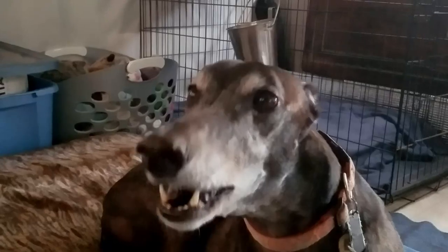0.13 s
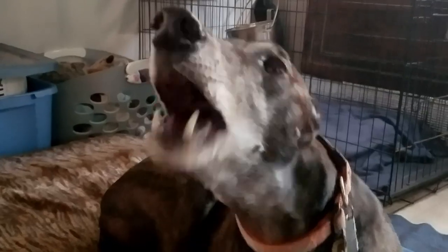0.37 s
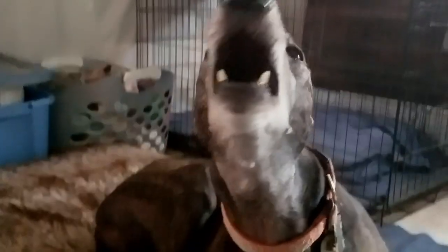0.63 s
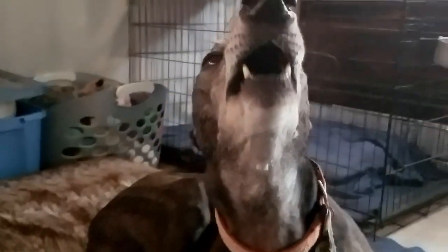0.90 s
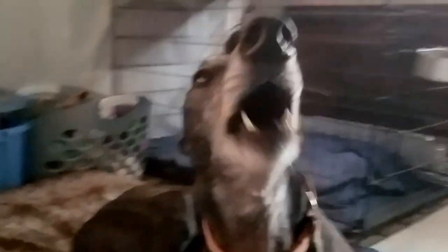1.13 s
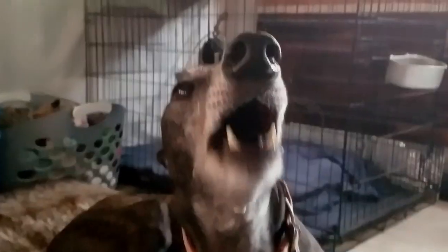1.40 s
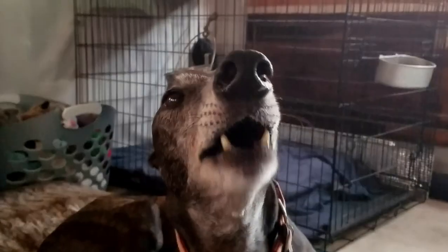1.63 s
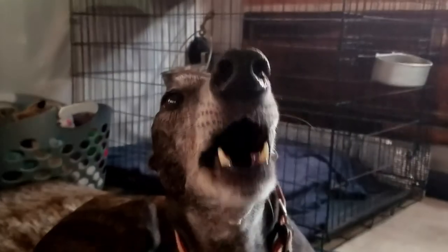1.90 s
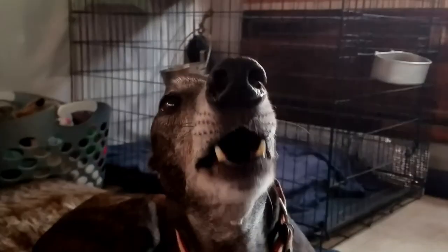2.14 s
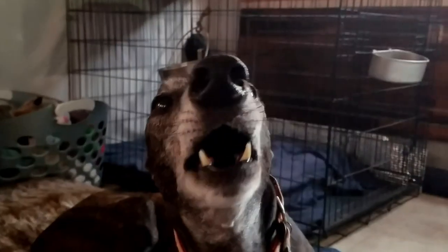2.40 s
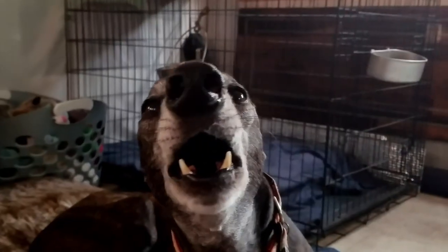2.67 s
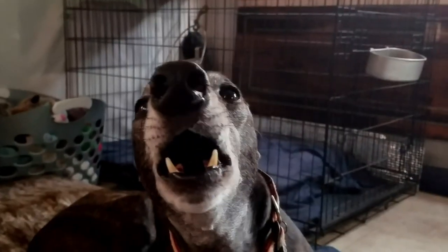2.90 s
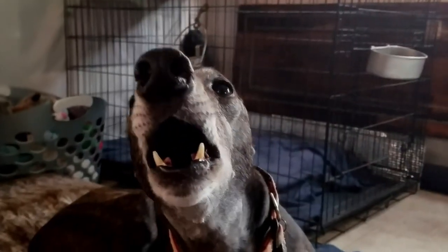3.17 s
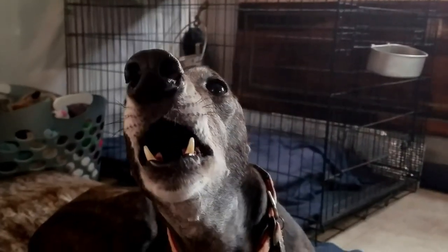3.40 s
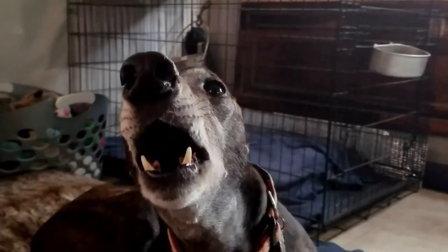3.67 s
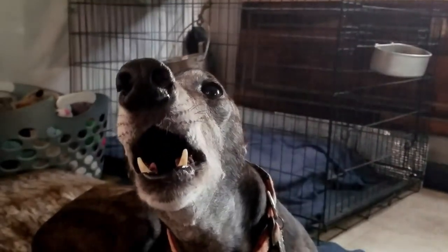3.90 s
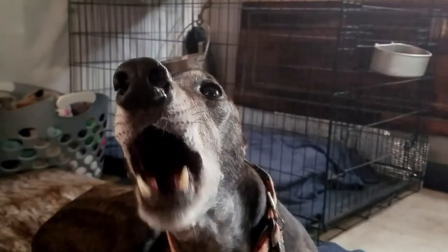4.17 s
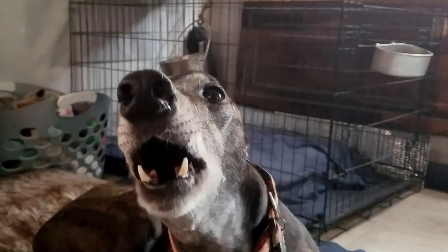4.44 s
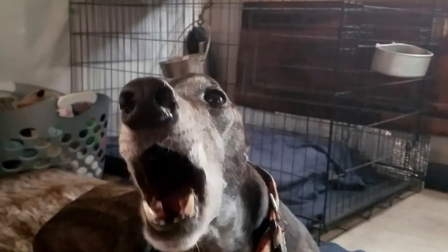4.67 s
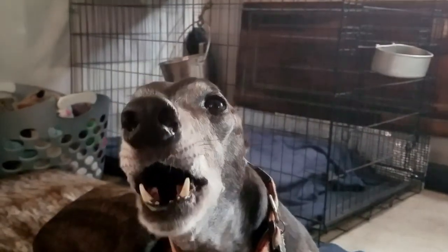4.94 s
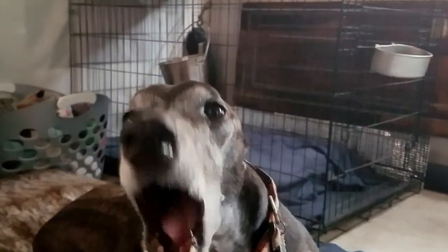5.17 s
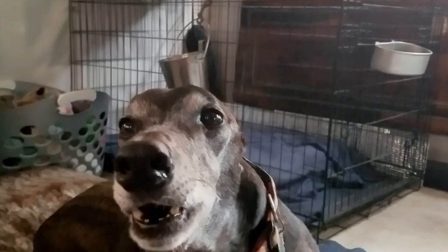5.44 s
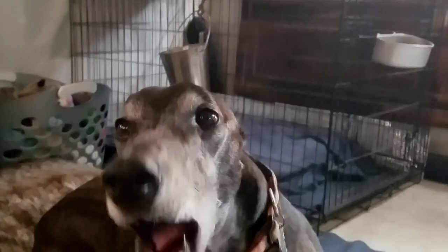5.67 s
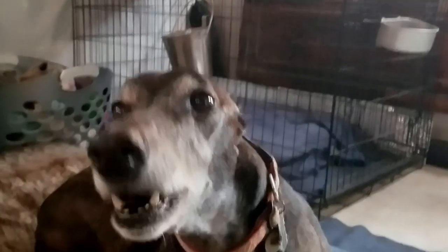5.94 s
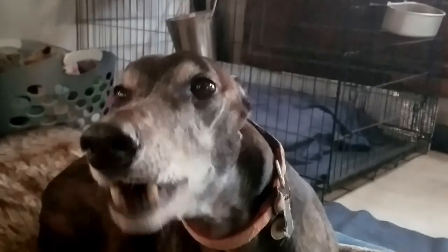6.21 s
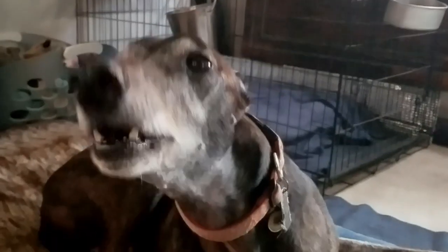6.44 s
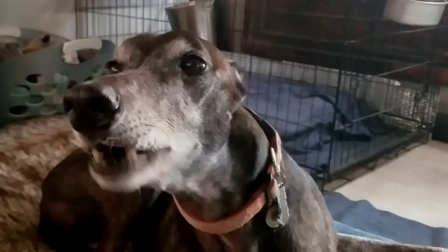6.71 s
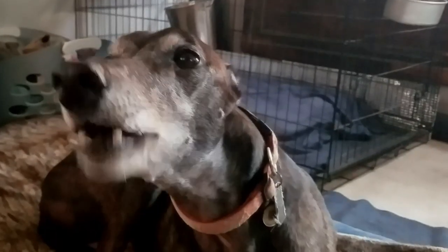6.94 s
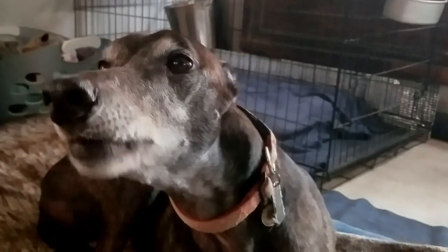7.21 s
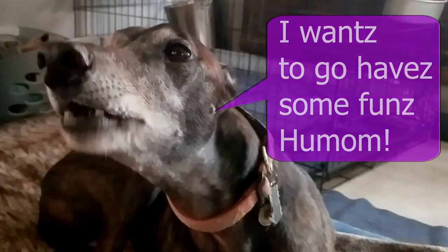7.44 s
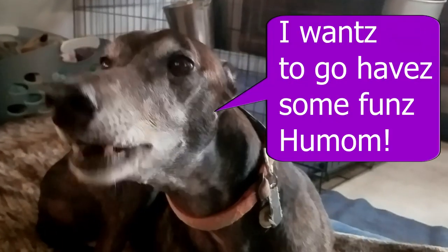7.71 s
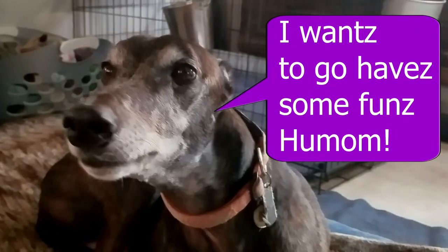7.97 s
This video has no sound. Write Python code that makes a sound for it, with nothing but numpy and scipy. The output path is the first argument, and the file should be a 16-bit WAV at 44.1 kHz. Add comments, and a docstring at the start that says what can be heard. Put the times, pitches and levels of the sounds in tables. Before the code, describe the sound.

A single dog howls right in front of the microphones, dry with only a short room echo. Raspy yelps come first, then wobbling oo-to-ow swells and a long, nearly steady howl. Near the end the voice flips between registers in shorter, rougher cries that fall away. Small piercing nose whistles peep through, then soft taps in the faint room air. The voice sits slightly to the right.

```python
"""Dog howling in a small room

A dog howls close to a two-microphone camera in a small furnished room: a creaky start, two yelps, one long
wavering note, then register jumps and short notes. The voice is a stack of partials shaped by moving
resonances; irregular flaps make the rasp. A thin nasal whistle, a sine with overtones and hiss, joins
the end, then faint knocks. Decaying noise gives the echo; faint shaped noise gives the room's rumble and hiss."""
import sys
import numpy as np
from scipy import signal
from scipy.fft import rfft, irfft, next_fast_len
from scipy.io import wavfile
from scipy.ndimage import uniform_filter1d, map_coordinates

SR = 44100
rng = np.random.default_rng(int(sys.argv[2]) if len(sys.argv) > 2 else 0)


def gain_from_db(level_db):
    """Convert decibel levels to linear amplitude factors (20 dB per decade)."""
    decades = np.asarray(level_db, float) / 20
    return 10 ** decades


def wav_record(signal):
    """Record a signal, one row per channel, as 16-bit PCM in the file named by sys.argv[1]."""
    frames = np.transpose(np.atleast_2d(signal))
    bounded = np.clip(frames, -1, 1)
    # unit amplitude maps onto the largest positive 16-bit level
    quanta = np.round(bounded * 32767).astype(np.int16)
    wavfile.write(sys.argv[1], SR, quanta)


N = 356592
TIME = np.arange(N) / SR


def unit(x):
    """Scaled to rms 1."""
    return x / np.sqrt(np.mean(x ** 2) + 1e-20)


def along(points, hz):
    """Interpolates (Hz, value) points on a log frequency axis."""
    f, v = np.transpose(points)
    return np.interp(np.log(hz + 1), np.log(f + 1), v)


def curves(rows, t=TIME):
    """One value per instant for each column after the time."""
    s, *cols = np.transpose(rows)
    return [np.interp(t, s, c) for c in cols]


def wobble(rate):
    """A smooth random curve, rate knots a second."""
    return map_coordinates(rng.standard_normal(int(N * rate / SR) + 4), [TIME * rate])


def filtered(x, response):
    """Passes x through a complex response of frequency."""
    m = next_fast_len(N + 8192)
    return irfft(rfft(x, m) * response(np.fft.rfftfreq(m, 1 / SR)), m)[..., :N]


def notes(tables, edge):
    """For each table: its stretch of samples, its columns and a fade at both ends."""
    for rows in tables:
        part = slice(round((rows[0][0] - edge) * SR), round((rows[-1][0] + edge) * SR))
        t = TIME[part]
        yield part, curves(rows, t), np.clip(np.minimum(t - t[0], t[-1] - t) / (2 * edge), 0, 1)


# Resonances that move as the mouth opens. Each row: centre in Hz shut, centre in Hz open, width in Hz,
# level in dB shut, level in dB open.
TRACT = [(639, 1251, 139, -2, 4.5), (1001.3, 1897.4, 167.3, -11, -5), (2224, 2323, 96, -50, -7.5),
         (2700, 2760, 132, -45.5, -23.5)]
# A side cavity cancels a narrow band. One row: centre in Hz shut, centre in Hz open, width in Hz, depth in dB.
NOTCH = (653, 1194, 65, -25.5)


def tract(f, opening, shift_hz, gain_db):
    """Gain in dB of the mouth and throat, a set of resonances that slide with the mouth opening."""
    roll_off_hz = 3000 + shift_hz  # the moving resonances pass little above this

    def mix(shut, wide):
        return shut + (wide - shut) * opening

    power = 0
    for i, (hz_shut, hz_open, width, db_shut, db_open) in enumerate(TRACT):
        top = i == len(TRACT) - 1  # only the last resonance takes the shift and gain
        away = f - mix(hz_shut, hz_open) - top * shift_hz
        power = power + gain_from_db(mix(db_shut, db_open) + top * gain_db) ** 2 / (1 + (2 * away / width) ** 2) ** 2
    power = power / (1 + (f / roll_off_hz) ** 10)
    shut, wide, width, depth_db = NOTCH
    return 10 * np.log10(power) + depth_db * np.exp(-((f - mix(shut, wide)) / width) ** 2)


# A slower second vibration beats against the voice. Each row: start in seconds, end in seconds, beat in Hz,
# sideband level in dB, lower over upper sideband of the overtones in dB, fading in dB per second.
BEATS = [(0.346, 0.389, 150, -9, 0, 16.5), (0.442, 0.517, 111.6, -9, -1, 56),
         (0.595, 0.619, 110, -9.5, -10.5, -11), (0.672, 0.833, 111.8, -16.5, 21.5, 70),
         (1.07, 1.137, 111.4, -6.5, -2, 2), (4.85, 4.993, 97.25, -10, -3.5, 111),
         (5.735, 5.906, 90.8, -10.5, 3.5, 79.5)]
# The fundamental's sidebands against the row's level. One row: lower in dB, upper in dB.
BEAT_FUNDAMENTAL_DB = (-9.5, -2)


def sidebands():
    """The second vibration as complex factors that split the fundamental (row 0) and the overtones (row 1)."""
    split = np.ones((2, N), complex)
    waver = np.cumsum(1 + .025 * wobble(50)) / SR
    for start, end, hz, db, skew_db, fading_db in BEATS:
        gate = np.clip(np.minimum((TIME - start) / 0.009, (end - TIME) / 0.026), 0, 1)
        gate = gate * gain_from_db(1.5 * wobble(40)) * gain_from_db(-fading_db * abs(TIME - start))
        spin = np.exp(2j * np.pi * hz * waver)
        low = gain_from_db(db + np.array([[BEAT_FUNDAMENTAL_DB[0]], [skew_db / 2]]))
        high = gain_from_db(db + np.array([[BEAT_FUNDAMENTAL_DB[1]], [-skew_db / 2]]))
        below = 1 / spin + .25 / spin ** 2
        above = spin + .6 * spin ** 2 + .3 * spin ** 3
        split += gate * (low * below + high * above)
    return split


# The voice, one table per register. Each row: time in seconds, pitch in Hz before smoothing,
# fundamental in dB, mouth opening from 0 to 1, overtone drive in dB.
HOWL = [
    [(0.045, 278.3, -50.5, 0.0, 10), (0.095, 299, -49.5, 0.1, -12), (0.105, 289, -59, 0.19, 17.5)],
    [(0.2, 771, -21.5, 0.6, 6.5), (0.25, 814.5, -9.5, 0.49, 9), (0.275, 787.4, -10.5, 0.44, 14),
     (0.3, 729, -15.5, 0.34, 13.5), (0.335, 561, -20.0, 0.08, 18), (0.365, 525, -15.5, 0.4, 1.5)],
    [(0.365, 572.6, -26.5, 0.05, 11.5), (0.39, 399.8, -14.5, 0.08, 2), (0.435, 402.7, -20.5, 0.02, 3.5),
     (0.525, 626, -20.5, 0.01, 19), (0.55, 616.5, -18, 0.06, 15.5), (0.6, 518, -17.5, 0.07, 12.5)],
    [(0.6, 438.3, -18, 0.1, -3), (0.655, 427, -12, 0.4, -8.5), (0.705, 400.6, -17, 0.36, 6),
     (0.83, 376.5, -22.5, 0.21, 2.5), (0.925, 399, -16.5, 0.38, 0.5), (0.975, 422.2, -15.5, 0.4, 9.5),
     (1.02, 426.4, -17.5, 0.74, 9)],
    [(1.02, 394.3, -28.5, 0.56, 20), (1.06, 373, -27.5, 0.51, 14), (1.092, 348.6, -31, 0.15, 18.5),
     (1.122, 353.4, -31.5, 0.44, 12.5), (1.147, 362, -23, 0.1, 14.5)],
    [(1.147, 367, -21.5, 0.06, 8.5), (1.22, 350.8, -24.5, 0.0, 11.5), (1.305, 360.1, -21.5, 0.02, 7.5),
     (1.39, 402, -16, 0.17, 9.5), (1.445, 439.5, -17, 0.75, 7.5), (1.54, 445.5, -17, 0.82, 3.5),
     (1.565, 420, -11.0, 0.44, 1.5), (1.615, 370.3, -19.5, 0.07, 7.5), (1.695, 359.9, -21, 0.0, 9),
     (1.85, 389.7, -17, 0.06, 2), (1.91, 425.8, -13, 0.4, 2.0), (1.96, 431.4, -12, 0.93, -11),
     (2.015, 424, -11.5, 0.8, -9.5), (2.07, 381.4, -17.5, 0.11, 5.5), (2.14, 369.6, -18.5, 0.05, 2),
     (2.42, 392.8, -14.5, 0.09, 2.0), (2.68, 393, -13.0, 0.07, 1.5), (2.93, 407.7, -10, 0.05, 2),
     (3.1, 410.5, -10, 0.18, -4), (3.205, 419.9, -10.5, 0.25, 0), (3.33, 399.2, -12.5, 0.14, -1.5),
     (3.56, 406.2, -12, 0.16, -1.5), (3.75, 417.2, -11.5, 0.35, 1.5), (3.8, 402.2, -13.5, 0.21, 1.5),
     (3.94, 408, -11.5, 0.15, -4.5), (4.06, 417.8, -9.5, 0.18, -2.0), (4.14, 443.3, -12, 0.46, 0),
     (4.165, 457.2, -13.5, 0.83, 0.5), (4.31, 424.3, -9.5, 0.26, -3.5), (4.46, 415.8, -14.0, 0.19, -0.5),
     (4.545, 435.4, -12, 0.33, -5.0), (4.635, 467.7, -14, 0.56, 8), (4.705, 466.2, -11.5, 0.58, 7),
     (4.815, 434.4, -12, 0.29, -5), (4.86, 438.2, -11.5, 0.3, 0)],
    [(4.86, 527.2, -16, 0.15, 3.0), (4.985, 546, -13.5, 0.3, 7), (5.04, 521.4, -10.0, 0.56, -7)],
    [(5.04, 493, -14.0, 0.71, 11), (5.165, 481.7, -14, 0.65, 13.5), (5.24, 443.2, -14, 0.54, 5),
     (5.27, 433, -10.0, 0.14, -2.5), (5.31, 394.3, -15, 0.01, 7.5), (5.41, 390.8, -15.5, 0.05, 9.5),
     (5.48, 448, -12, 0.36, -5), (5.565, 477.8, -13.5, 0.63, 12.5), (5.67, 451.4, -15, 0.43, 1),
     (5.7, 416, -11.5, 0.0, 10), (5.74, 408.5, -18, 0.16, 6)],
    [(5.74, 492.7, -24.5, 0.24, 9), (5.855, 492.3, -26.5, 0.3, 8.5), (5.915, 502.4, -16, 0.27, 8.5)],
    [(5.915, 445, -11.5, 0.58, 4.5), (5.985, 494.1, -13.0, 0.39, 6), (6.012, 528, -13.5, 0.6, 4.5)],
    [(6.012, 579.4, -14.0, 0.33, 8), (6.115, 567.3, -19.5, 0.34, 18.5), (6.14, 534.6, -18, 0.5, 8.5),
     (6.2, 529.7, -22, 0.2, 9.5), (6.255, 459.4, -32, 0, 8.5), (6.4, 465, -24.0, 0.5, -3)],
    [(6.4, 408.8, -18.5, 0.39, 9), (6.425, 440, -12.5, 0.77, -2.5), (6.53, 448.2, -20, 0.72, 4.5),
     (6.595, 430.2, -13.0, 0.74, -15.5), (6.65, 425.3, -15.5, 0.5, 5.5)],
    [(6.65, 445.4, -24.5, 0.58, 11.5), (6.705, 450.7, -33, 0.7, -7), (6.86, 382.4, -31.5, 0.3, 3.5),
     (6.905, 416.3, -15, 0.53, -2), (7.075, 460.9, -14, 0.8, -4.5)],
    [(7.075, 476, -19.5, 0.83, 12), (7.135, 425.4, -17, 0.56, -3.0), (7.165, 393, -25.5, 0.5, 11),
     (7.24, 383.6, -80, 0, 2)],
]
# Fixed resonances of the treble. Each row: centre in Hz, width in Hz, relative level in dB.
UPPER = [(3200, 400, -30), (3850, 500, -33), (4780, 500, -20), (5690, 600, -19), (6760, 900, -22),
         (9430, 710, -28.5), (11340, 800, -28), (14600, 1500, -34)]
# Treble at a fundamental of 0 dB, mouth shut. Each row: time in seconds, level in dB.
TREBLE = [(.05, -71), (.2, -45), (.26, -40.5), (.4, -62), (.55, -49), (.85, -59), (1.02, -47.5),
          (1.3, -52.5), (2.2, -59), (2.7, -55.5), (2.95, -49), (3.3, -60), (3.7, -54.5), (4.4, -56),
          (4.95, -49), (5.4, -61), (5.85, -49), (6.1, -48.5), (6.5, -60.5), (7.05, -62), (7.1, -53.5),
          (7.24, -51)]
# The highest moving resonance sits higher and stronger in the yelps.
# Each row: time in seconds, shift in Hz, gain in dB.
YELP_RING = [(.2, 240, 4), (.75, 330, 11), (.86, 1, 1.5)]
# Breath excites a narrow nasal resonance. One row: centre in Hz, width in Hz, level in dB against
# the higher partials.
RING = (2770, 60, -13)
# Fast pitch scatter. One row: share of the pitch at rest, share added per octave a second of gliding.
JITTER = (.001, .0025)


def voice():
    """Steady fold vibration: a stack of partials with slight tremor; breath fills the treble resonances."""
    treble_follows, treble_open_db = .3, 7  # share of the voice's level in dB; gain with the mouth open
    breath_db = -8  # against the treble partials
    step = 16  # samples between gain points
    jitter, tremor, shimmer = wobble(300), wobble(45), gain_from_db(0.043 * wobble(120))
    out, nasal, treble = np.zeros((2, N), complex), np.zeros(N), np.zeros(N)
    k = np.arange(2, 40)[:, None]  # overtone numbers
    # each partial from the fourth up swells and fades on its own
    swells = np.array([(.8 * wobble(7) + .6 * wobble(30))[::step] for _ in k])
    patchy = gain_from_db(np.clip(k - 3, 0, 5) * swells)

    def tops(f):
        return np.sqrt(sum(gain_from_db(db) ** 2 / (1 + (2 * (f - c) / w) ** 6) for c, w, db in UPPER))

    for part, (hz, db, opening, drive_db), fade in notes(HOWL, edge=.004):
        def fine(g):
            return np.interp(np.arange(len(hz)), np.arange(len(g)) * step, g)

        hz = uniform_filter1d(hz, 1500, mode="nearest")
        glide = np.clip(abs(np.gradient(np.log2(hz))) * SR, 0, 5)  # octaves a second
        scatter = (JITTER[0] + JITTER[1] * glide) * jitter[part]
        turn = np.exp(2j * np.pi * np.cumsum(hz * (1 + .0018 * tremor[part] + scatter)) / SR)
        top_db = curves(TREBLE, TIME[part])[0] + treble_follows * db + treble_open_db * opening
        f = k * hz[::step]
        yelp = curves(YELP_RING, TIME[part][::step])
        low = gain_from_db(tract(f, np.clip(opening, 0, 1)[::step], *yelp) + (db + drive_db)[::step])
        upper = tops(f) * (f > 3000) * (f < 15800)
        upper = upper * gain_from_db(top_db[::step]) / np.sqrt(np.sum(upper ** 2, axis=0))
        overtones = (low + upper) * patchy[:, part.start // step:][:, :f.shape[1]]
        gains = [gain_from_db(db)] + [fine(g) for g in overtones]
        partial = np.sqrt(2) * fade
        for i, (g, lead) in enumerate(zip(gains, rng.random(len(gains)))):
            partial = partial * turn  # one harmonic higher each time
            out[min(i, 1), part] += g * partial * np.exp(2j * np.pi * lead)
        nasal[part] += fade * gain_from_db(RING[2]) * fine(np.sqrt(np.sum(low ** 2 * (f > 2050), axis=0)))
        treble[part] += fade * gain_from_db(top_db + breath_db) * (1 + .6 * turn.real)  # puffs once a cycle

    def breath(x):
        return filtered(x, lambda f: tops(f) * (f > 3600) * gain_from_db(along([(5000, 8), (12000, 7.5)], f)))

    noise = rng.standard_normal(N)
    ring = nasal * unit(filtered(noise, lambda f: 1 / (1 + (2 * (f - RING[0]) / RING[1]) ** 2)))
    partials = (out * sidebands()).real.sum(axis=0) * shimmer
    return partials + ring + breath(noise * treble) / np.std(breath(noise))


# Spectrum of the room air. Each row: frequency in Hz, relative density in dB per Hz.
AIR = [(20, -27), (40, -13.5), (80, -5.5), (105, -8), (140, -5.5), (220, -18), (600, -26), (2900, -30),
       (4400, -41.5), (8500, -35), (15700, -35.5)]
# How alike the two sides are. Each row: frequency in Hz, left-right correlation from -1 to 1.
ALIKE = [(60, 0.83), (180, -0.13), (550, 0.27), (1650, -0.013), (4970, 0.3), (15000, -0.24)]


def air():
    """Room rumble and hiss: shaped noise, mid against side set by the likeness, most alike in the bass."""
    level_db = -62  # before the slow drift

    def mid_side(hz):
        turn = np.arccos(np.clip(along(ALIKE, hz), -1, 1)) / 2
        return gain_from_db(along(AIR, hz)) * [np.cos(turn), np.sin(turn)]

    mid, side = filtered(rng.standard_normal((2, N)), mid_side)
    fade_in = np.clip((TIME - .045) / 0.015, 0, 1)
    return gain_from_db(level_db + 2.2 * wobble(3.3)) * unit(np.array([mid + side, mid - side])) * fade_in


# Decay of the room. Each row: frequency in Hz, time to fall 60 dB in seconds.
ROOM = [(300, .2), (2000, .15), (10000, .1)]


def room(x):
    """The echo as stereo noise in which each frequency dies at its own speed, after a short delay."""
    hz, t, z = signal.stft(rng.standard_normal((2, SR // 2)), SR, nperseg=256)
    tail = signal.istft(z * gain_from_db(-60 * t / along(ROOM, hz)[:, None]), SR, nperseg=256)[1]
    delayed = np.pad(x, (200, 0))[None]  # samples
    return signal.fftconvolve(delayed, tail / np.linalg.norm(tail[0]), axes=1)[:, :N]


# Irregular fold flaps. Each row: time in seconds, mean flaps a second, unevenness of rate in dB,
# mouth brightness in dB.
FLAPS = [(.108, 72, 1.37, -8.5), (.13, 116, 1.5, 0.5), (.16, 214, 2.5, -8.5), (.23, 480, 1.5, 3.5),
         (.36, 450, 2, -6.5), (.9, 456, 2.5, -9), (1.06, 370, 2, 6.5), (1.2, 280, 2.5, -18.5),
         (7.2, 433, 3, 9)]
# Throat resonances. Each row: centre in Hz, width in Hz, level in dB.
THROAT = [(105, 50, -19), (450, 75, 0), (830, 170, -6)]
# Mouth resonances. Each row: centre in Hz, width in Hz, level in dB before the brightness.
MOUTH = [(1540, 530, -7.5), (2420, 530, -18.5), (4060, 330, -25), (6000, 830, -26)]
# The folds lose their rhythm at breaks of the voice. Each row: time in seconds, hold in seconds, level in dB.
BREAKS = [(0.145, 0.046, -12.5), (0.351, 0.057, -33.5), (.49, 0.0016, -33.5), (0.602, 0.026, -32.5),
          (.68, 0, -37.5), (1.069, .06, -24), (5.92, 0.00044, -33), (6.019, 0.025, -41), (6.409, 0, -39),
          (7.092, 0.036, -42)]


def rasp():
    """Where the folds lose their rhythm, scattered flaps of uneven size ring the throat and mouth."""
    rise, fall = 399, 331.5  # dB per second
    hoarse_db = -36.5  # constant hoarseness against the fundamental
    rate, uneven_db, bright_db = curves(FLAPS)
    cycles = np.cumsum(rate * gain_from_db(uneven_db * wobble(120)) * (TIME > .108)) / SR
    at = np.flatnonzero(np.diff(np.ceil(cycles)))
    flaps = .015 * rng.standard_normal(N)
    flaps[at] += gain_from_db(1.2 * uneven_db[at] * rng.standard_normal(N)[:len(at)])
    flaps /= np.sqrt(uniform_filter1d(flaps ** 2, 3000))  # even loudness

    bursts = 0
    for s, hold, db in BREAKS:
        bursts = bursts + gain_from_db(db - rise * np.clip(s - TIME, 0, 1) - fall * np.clip(TIME - s - hold, 0, 1))
    voice_db = curves([row for rows in HOWL for row in rows])[1]
    gain = (bursts + gain_from_db(voice_db + hoarse_db)) * (TIME > .107) * (TIME < 7.25)

    def modes(f, rows):
        return sum((-1) ** k * gain_from_db(db) * 1j * f * w / (c * c - f * f + 1j * f * w)
                   for k, (c, w, db) in enumerate(rows))

    def low_cut(f):
        return 1j * f / (120 + 1j * f)

    def ring(x):
        throat = filtered(x, lambda f: modes(f, THROAT) * low_cut(f))
        mouth = filtered(x * gain_from_db(bright_db), lambda f: modes(f, MOUTH) * low_cut(f) ** 2)
        # flesh closes softly
        return filtered(throat + mouth, lambda f: 1 / (1 + 1j * f / 2400) ** 3)

    return ring(flaps * gain) / np.std(ring(flaps))


# Nasal whistle, one table per note. Each row: time in seconds, pitch in Hz, level in dB.
WHISTLE = [
    [(6.645, 2780, -70.5), (6.665, 2732, -37.5), (6.72, 2746, -49), (6.79, 2663, -50.5), (6.81, 2786, -38),
     (6.89, 2800, -43), (6.92, 2745, -71.5)],
    [(7.075, 2835, -51), (7.09, 2792, -31), (7.19, 2724, -37.5), (7.225, 2670, -73)],
    [(7.43, 2740, -42), (7.446, 2700, -25), (7.475, 2721, -20), (7.51, 2720, -30.5), (7.52, 2672, -30.5),
     (7.535, 2706, -57.5), (7.58, 2770, -66.5)],
    [(7.592, 2890, -62.5), (7.61, 2880, -57), (7.63, 2850, -69.5)],
]
# Overtones of the whistle. Each row: multiple of the pitch, level in dB against the fundamental.
OVERTONES = [(2, -16.5), (3, -34.5), (4, -42), (5, -35)]
# Air through the nose. Each row: frequency in Hz, relative density in dB per Hz.
PUFF = [(300, -21.5), (900, -6.5), (1250, -12.5), (1750, 0), (2300, -11), (3000, -0.5), (3500, -42.5),
        (4300, -33), (4900, 0), (5800, -6), (6500, -25.5), (11000, -17), (15700, -24.5)]


def whistle():
    """A thin tone from the nose, with the hiss of the air that drives it."""
    out = np.zeros(N)
    hiss = unit(filtered(rng.standard_normal(N), lambda f: gain_from_db(along(PUFF, f))))
    drift = wobble(90)
    for part, (hz, db), fade in notes(WHISTLE, edge=.004):
        phase = 2 * np.pi * np.cumsum(hz * (1 + 0.0015 * drift[part])) / SR
        tone = np.sin(phase) + sum(gain_from_db(level) * np.sin(k * phase) for k, level in OVERTONES)
        out[part] += fade * (np.sqrt(2) * gain_from_db(db) * tone + gain_from_db(db - 20) * hiss[part])
    return out


# Faint soft knocks. Each row: time in seconds, level in dB before dulling, pitch in Hz.
TAPS = [(7.759, -61, 532), (7.844, -55.5, 431), (7.864, -49.5, 404), (7.896, -49, 440), (7.99, -55, 271)]


def taps():
    """Dull short knocks: a fast-dying sine with a shorter burst of noise, dulled by a low-pass."""
    out, t = np.zeros(N + 2000), np.arange(2000) / SR
    for s, db, hz in TAPS:
        body = gain_from_db(-60 * t / 0.044) * np.sin(2 * np.pi * hz * t)
        click = .3 * gain_from_db(-60 * t / 0.0046) * rng.standard_normal(2000)
        out[round(s * SR):][:2000] += gain_from_db(db) * (body + click)
    return filtered(out[:N], lambda f: 1 / (1 + 1j * f / 2000))


# The head's place. Each row: time in seconds, left-right level in dB, mean delay of the right in microseconds.
HEAD = [(0, -1, 55), (.6, -8.5, 58), (2.2, -8, 24), (2.8, -5, 76), (3.8, -4.5, 55), (4.5, -5.5, 80),
        (5.7, -3.5, 76), (6.2, -5, 74), (6.8, -7, 163), (7.5, -4.5, 120)]
# The two microphones differ. Each row: frequency in Hz, left-right level in dB before a constant offset.
TILT = [(60, -7), (150, 8.5), (380, 1), (950, 0.5), (2380, -2.5), (5000, 6.5), (9000, -3.5), (13000, 10.5)]


def scene():
    """The head moves in front of the microphones; sound reaches the right one a little later."""
    room_db, tilt_offset_db = -17, 2.5
    dog = voice() + rasp() + whistle() + taps()
    pan_db, lag = curves(HEAD)
    lag = lag + 14 * wobble(5)  # microseconds
    right = map_coordinates(dog, [np.arange(N) - lag * SR / 1e6], order=5)
    pair = np.array([dog * gain_from_db(pan_db / 2), right * gain_from_db(-pan_db / 2)])
    pair = filtered(pair, lambda f: gain_from_db((along(TILT, f) + tilt_offset_db) / 2 * np.array([[1], [-1]])))
    loudness = np.sqrt(abs(uniform_filter1d(dog ** 2, 13000)))
    duck = 1 / (1 + loudness / 0.32)  # the camera's noise suppressor turns the air down under the loud voice
    return pair + gain_from_db(room_db) * room(dog) + duck * air()


def top_cut(x):
    """Nothing passes above the cut-off."""
    return signal.sosfilt(signal.butter(12, 15890, fs=SR, output="sos"), x)


def record(dry):
    """The camera's input rounds off the loudest peaks."""
    soft = dry / (1 + abs(dry / .85) ** 6) ** (1 / 6)
    return top_cut(soft)


dry = scene()
out = record(dry)
wav_record(out)
```